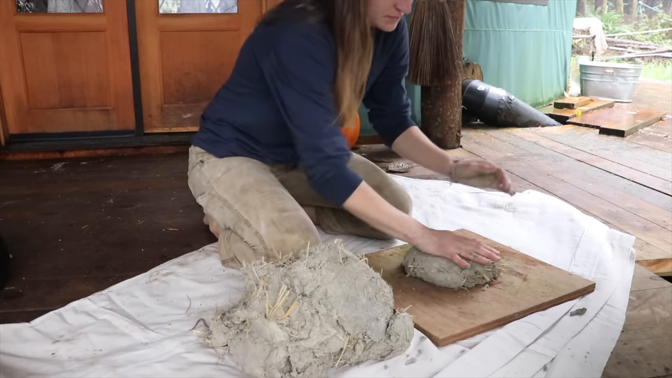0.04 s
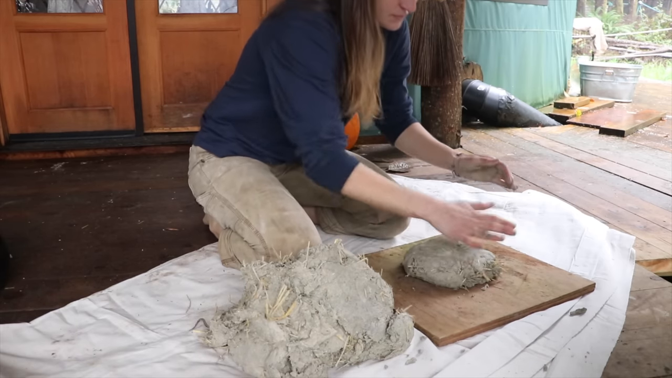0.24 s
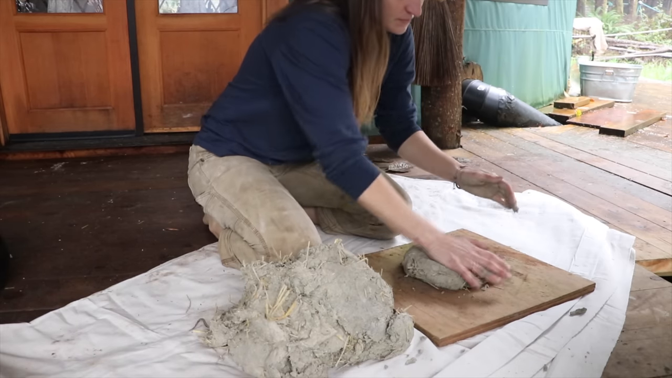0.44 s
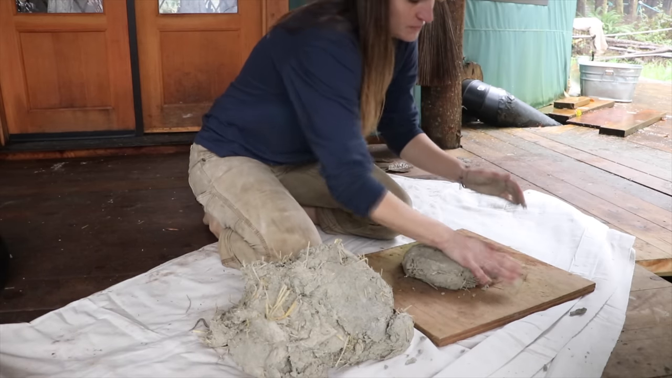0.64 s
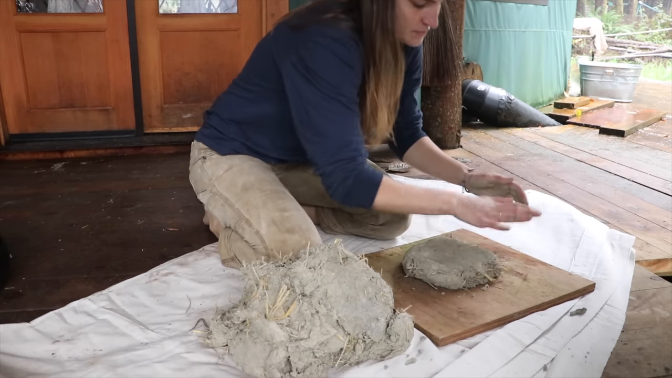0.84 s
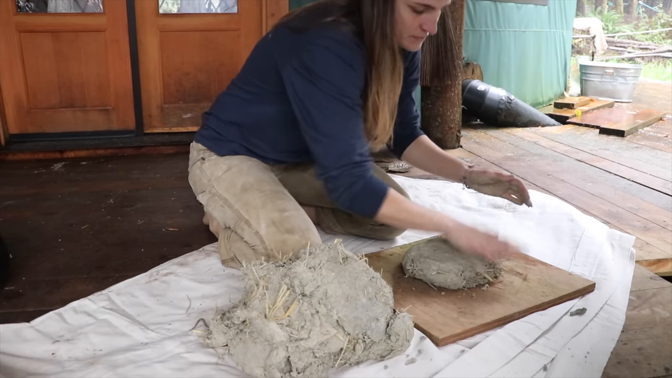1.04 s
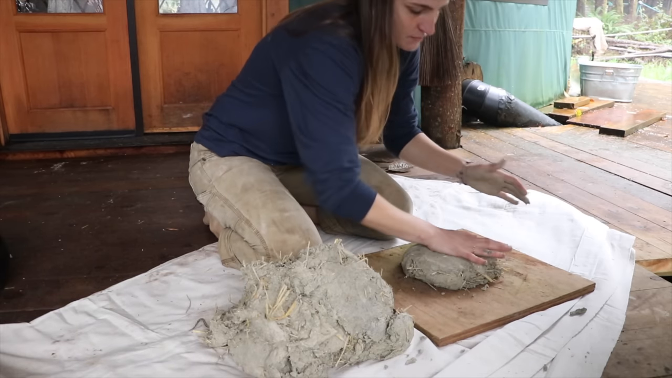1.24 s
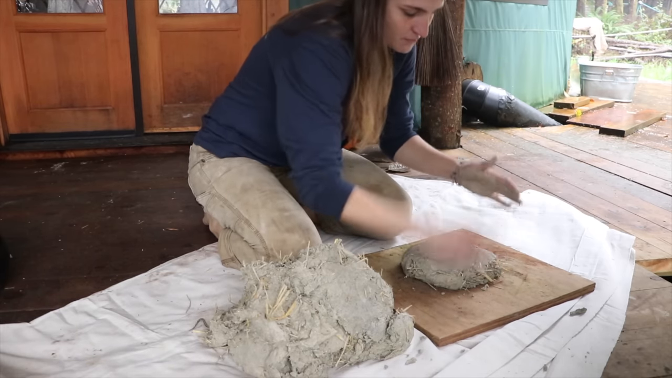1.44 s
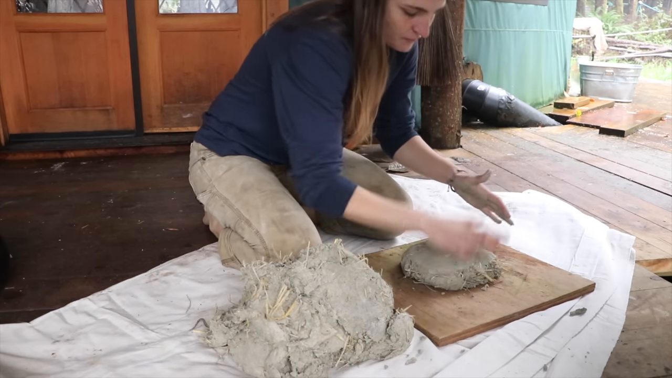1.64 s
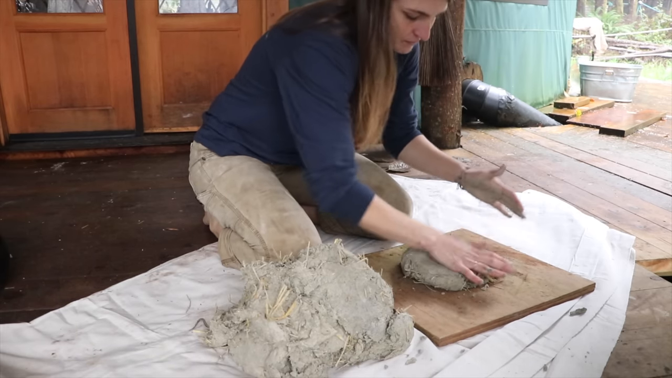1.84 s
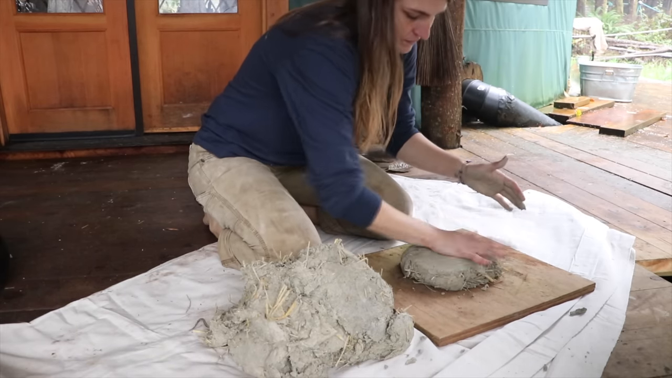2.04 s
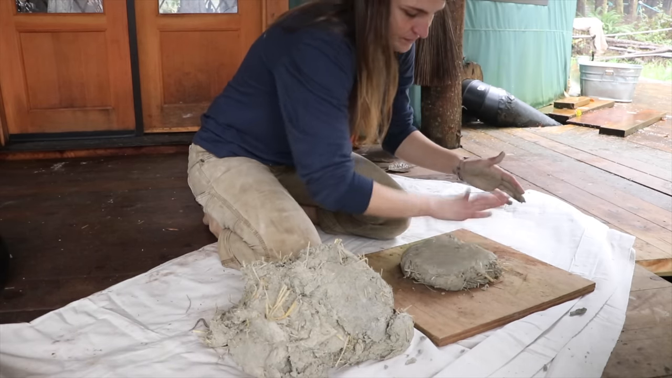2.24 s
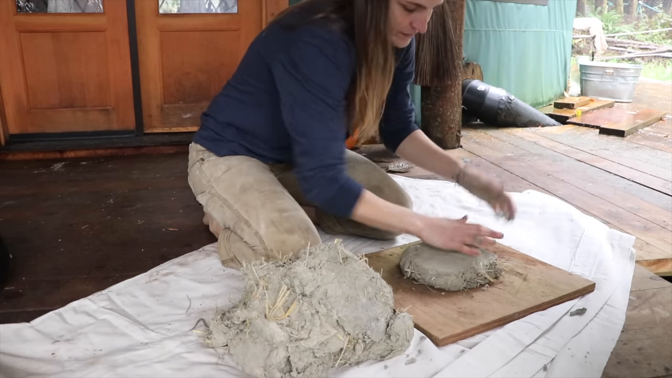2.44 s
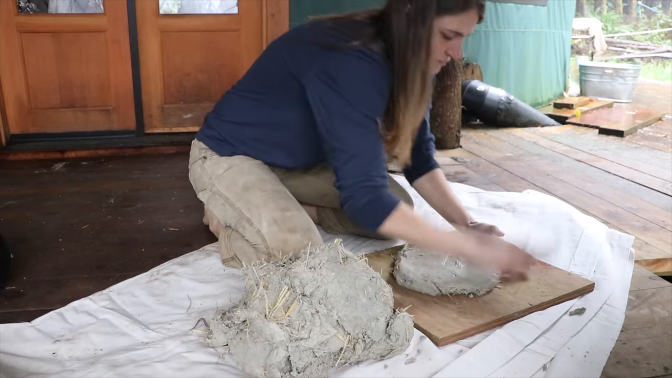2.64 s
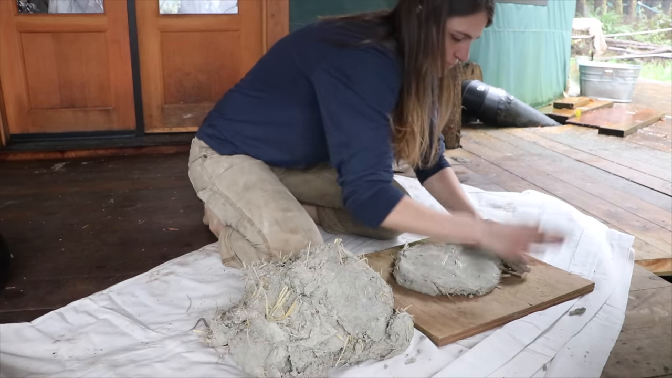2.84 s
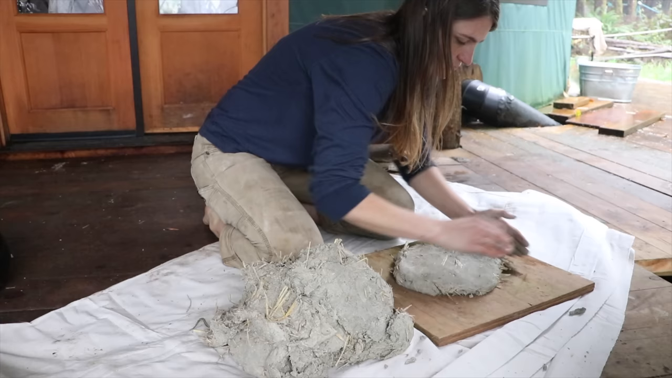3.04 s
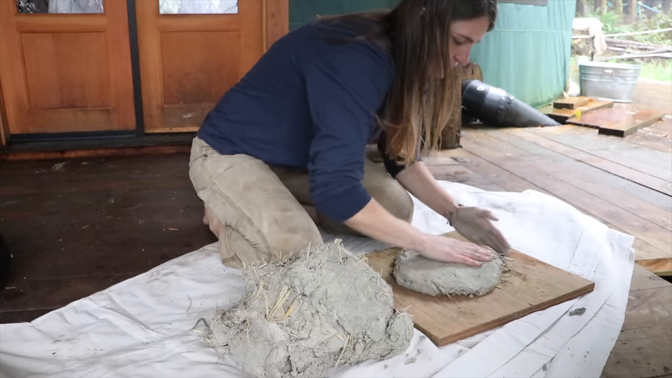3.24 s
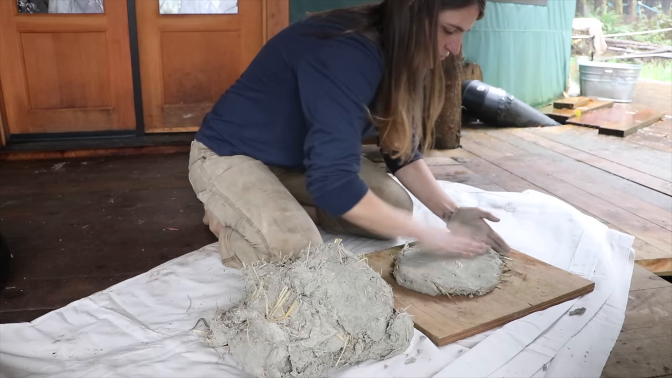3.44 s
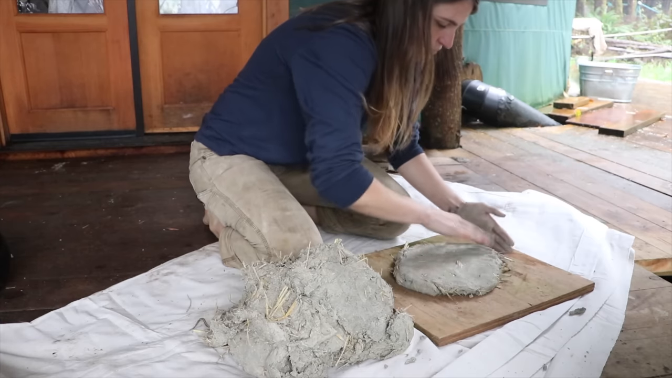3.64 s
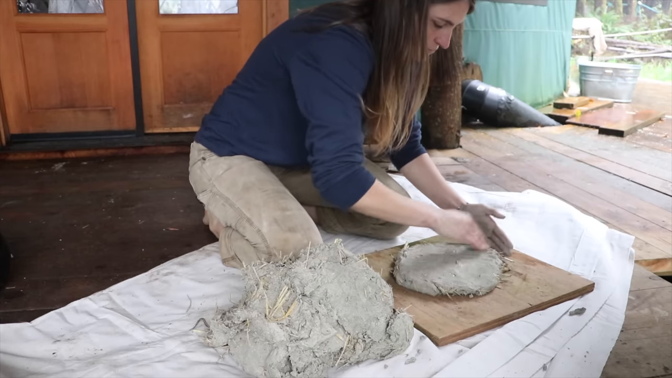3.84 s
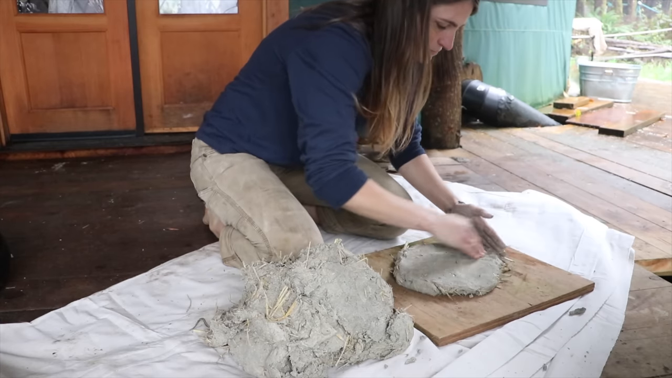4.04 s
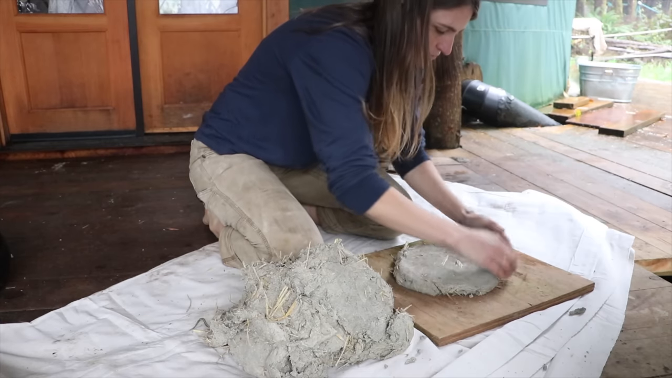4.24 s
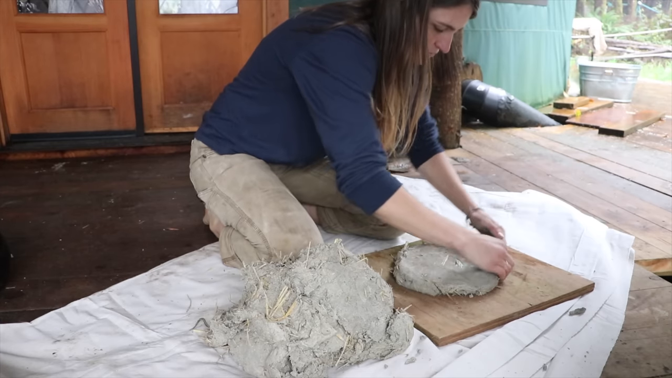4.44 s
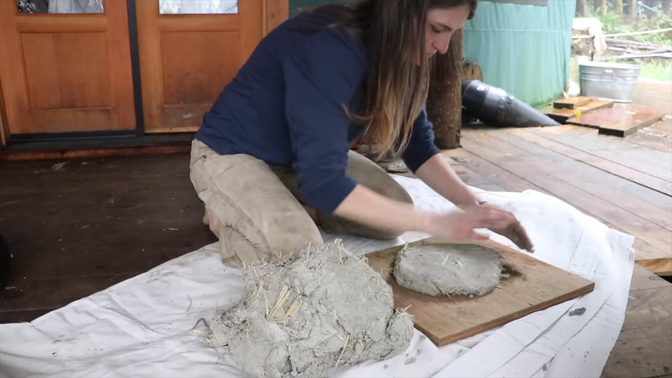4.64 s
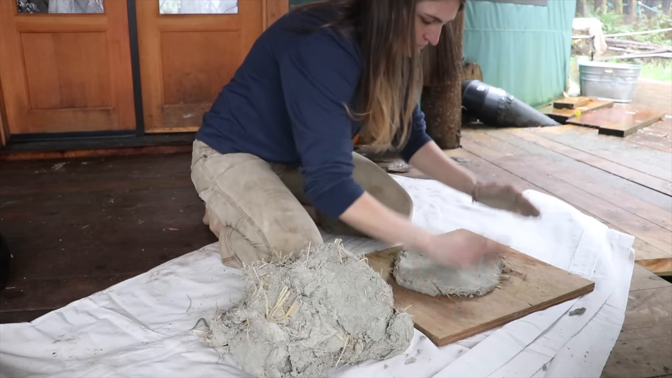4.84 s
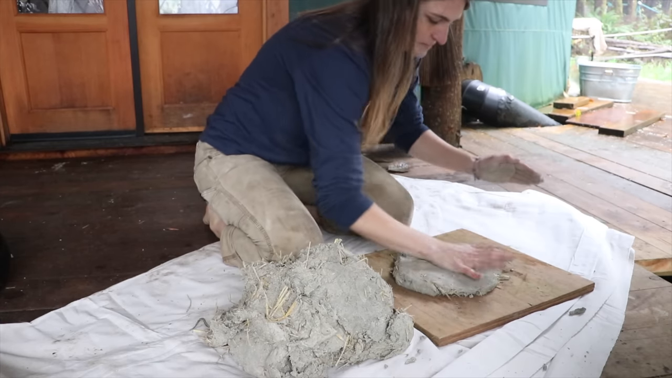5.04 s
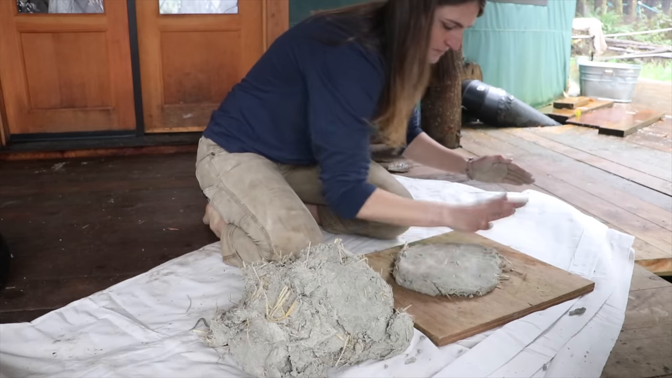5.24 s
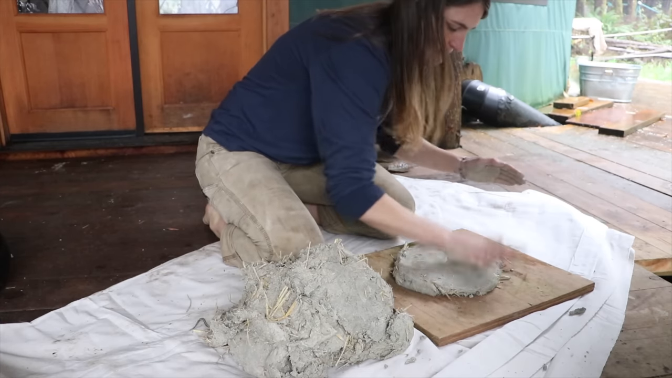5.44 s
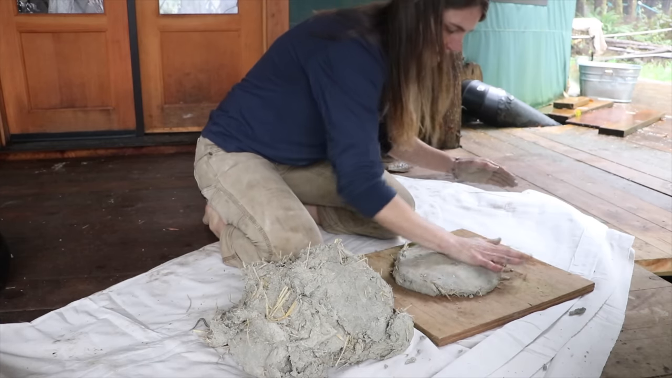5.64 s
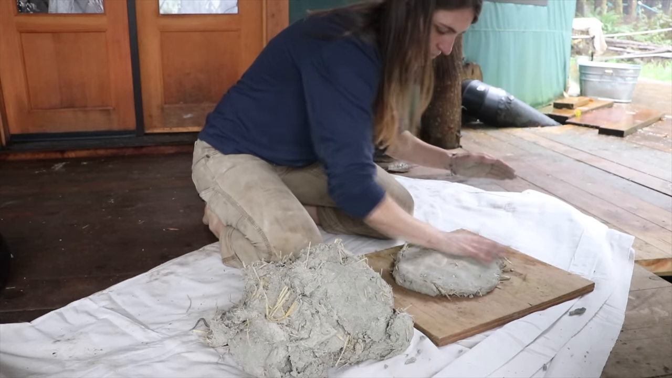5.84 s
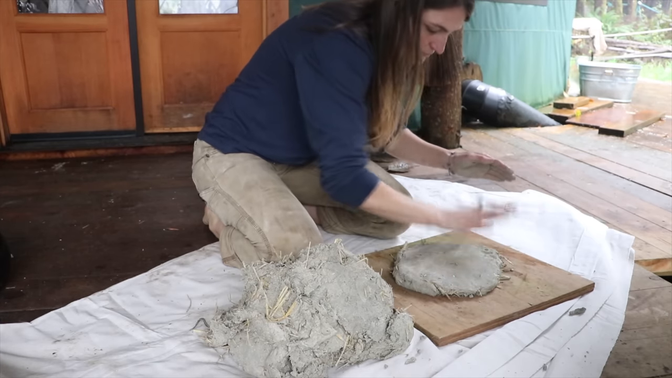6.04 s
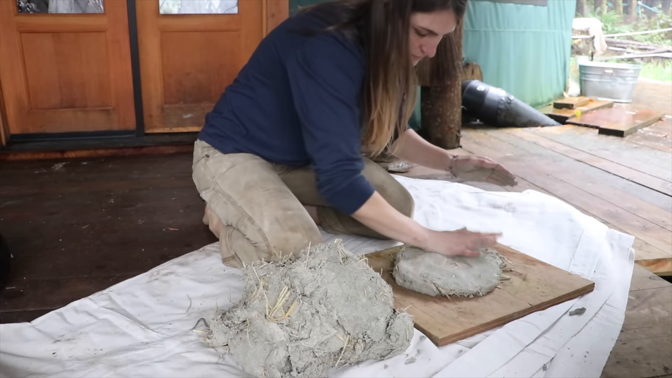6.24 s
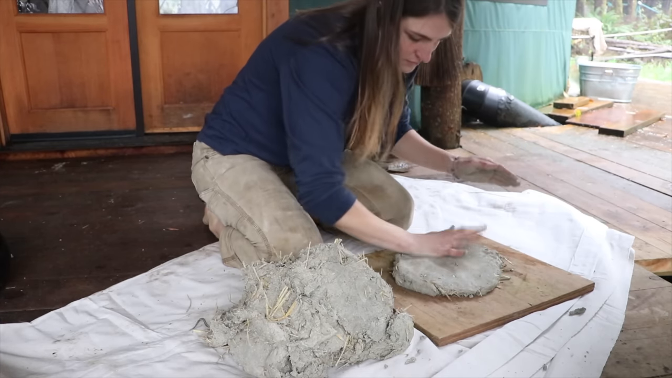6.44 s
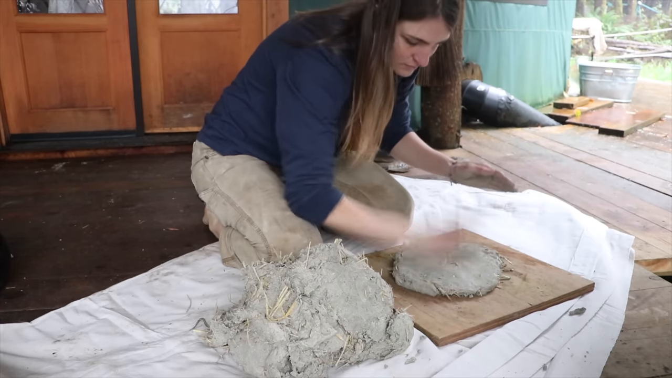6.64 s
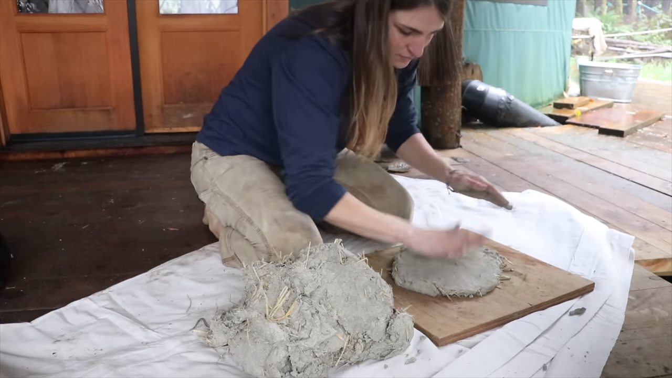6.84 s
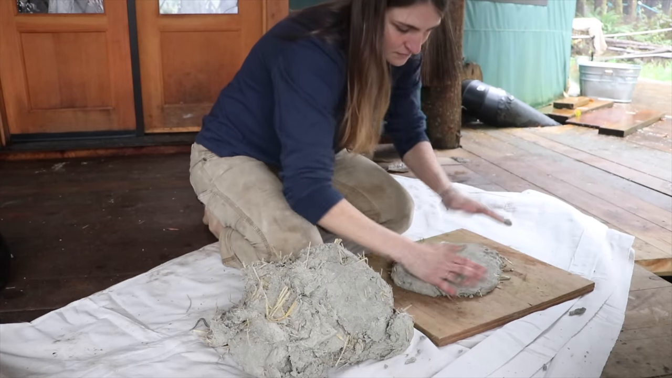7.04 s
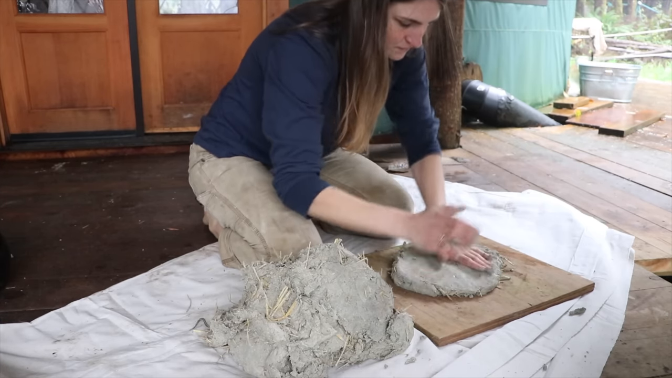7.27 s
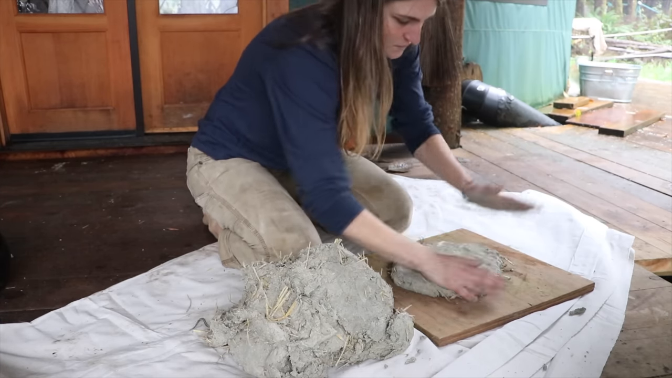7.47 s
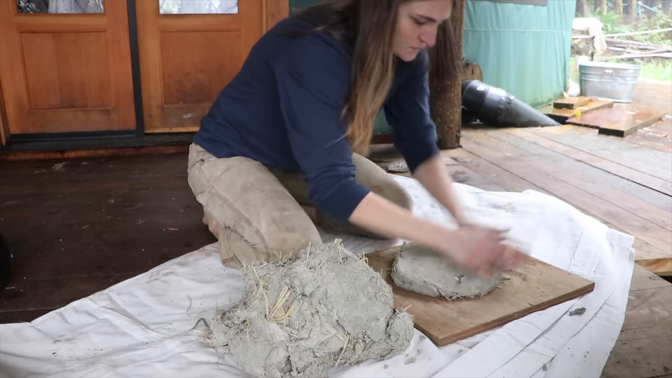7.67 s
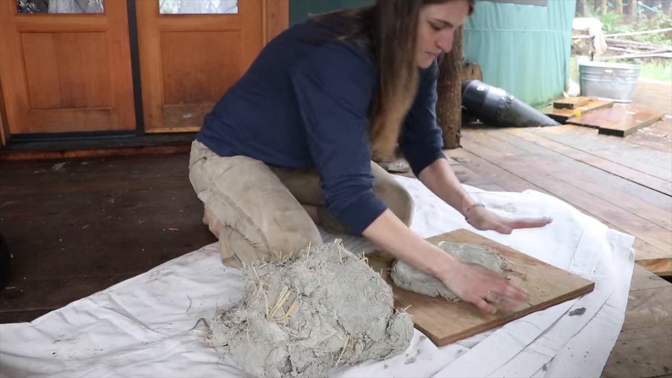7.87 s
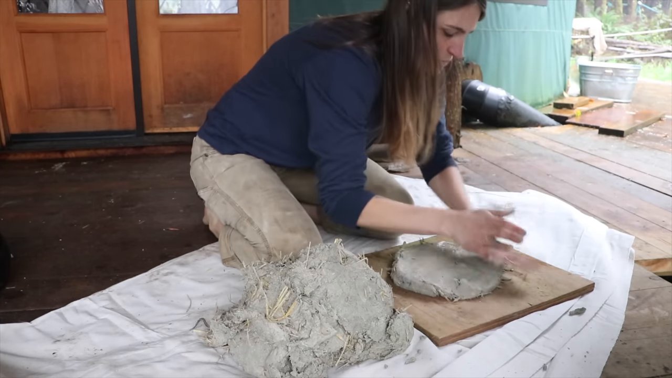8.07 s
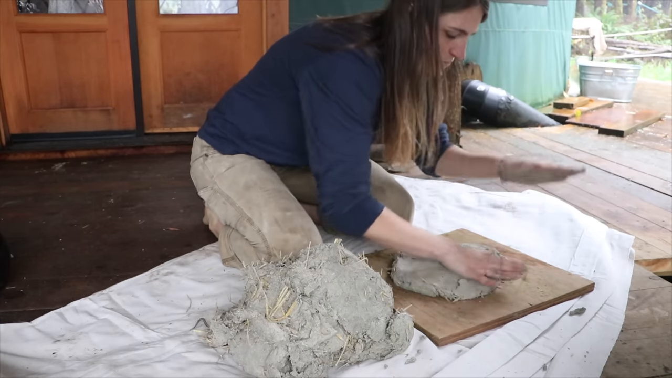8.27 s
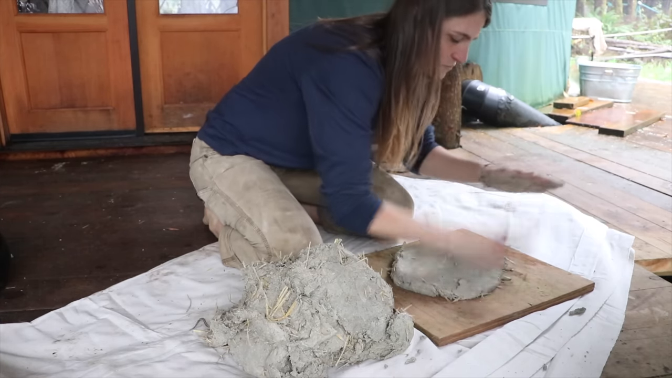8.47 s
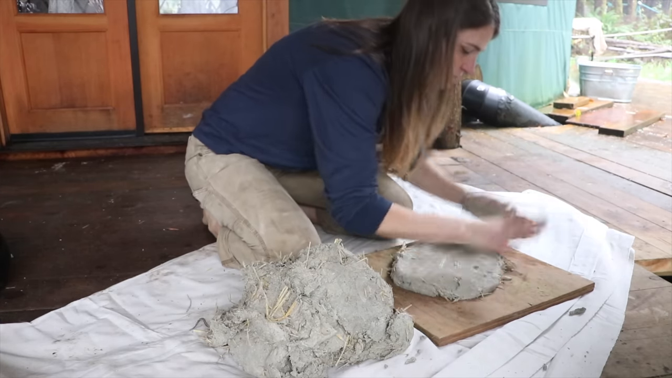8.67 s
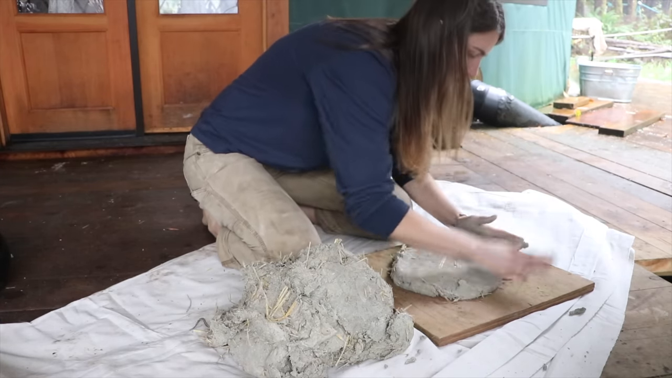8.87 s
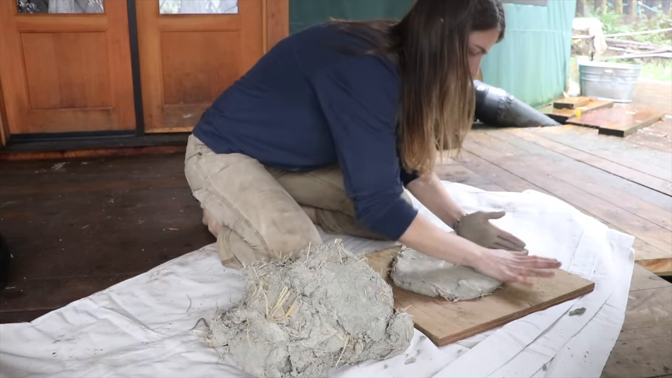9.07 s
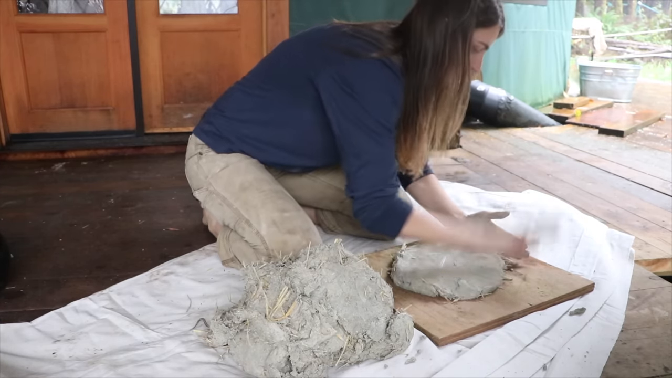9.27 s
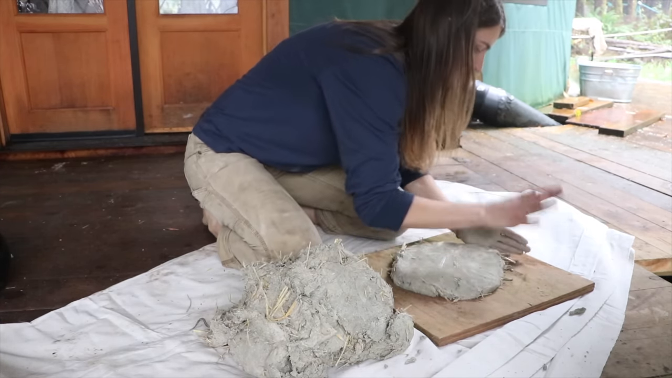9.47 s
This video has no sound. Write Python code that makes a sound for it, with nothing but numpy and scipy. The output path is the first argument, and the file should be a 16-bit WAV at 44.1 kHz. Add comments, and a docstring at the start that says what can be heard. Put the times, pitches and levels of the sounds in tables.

```python
"""Wet slaps, a few a second, over light rain: bare hands pat a cake of clay and straw flat on a board
lying on a wooden porch. Each slap is the crack of a bursting water film, a pop of air under the palm
and a thump into the deck, echoed by roof and wall. A sleeve swishes ahead of it, and the skin peels off
after it with a fine crackle. In between, the palms rub the clay smooth, the roof drips, and once a faint
high ring comes and goes. The hardest blows overload the microphone."""
import sys
import numpy as np
from scipy import signal
from scipy.fft import rfft, irfft, next_fast_len
from scipy.io import wavfile

SR = 44100
rng = np.random.default_rng(int(sys.argv[2]) if len(sys.argv) > 2 else 0)


def file_out(sig):
    """Save sig as 16-bit WAV at sys.argv[1]."""
    # one column per channel
    cols = np.atleast_2d(sig).T
    # limit, then scale
    lim = np.clip(cols, -1, 1)
    pcm = np.round(lim * 32767).astype(np.int16)
    wavfile.write(sys.argv[1], SR, pcm)


N = 419391
TIME = np.arange(N) / SR
SLAP_TIME = TIME[:int(.4 * SR)]

# Echo of the porch roof and house wall. Each row: octave centre in Hz, relative spectral level in dB,
# seconds to fall 60 dB.
PORCH_ECHO = [(216, -0.5, 0.21), (480, -0.5, 0.2), (880, -0.5, 0.19), (1670, -1.5, 0.2), (3890, -0.5, 0.2),
              (6500, -1, 0.18), (14000, -18, 0.42)]
# Colour of the rain on roof and yard. Each row: frequency in Hz, relative spectral level in dB.
RAIN_SPECTRUM = [(30, -6), (50, -14), (100, -0.5), (300, 3), (650, 0), (1700, 0.5), (2600, -6.5),
                 (3400, -0.5), (4050, 0.5), (4800, -14), (8000, -17.5), (10500, -30.5), (16000, -27.5)]
# Tones of the faint high ring. Each row: pitch in Hz, level in dB.
RING_TONES = [(3620, -58), (4317, -56), (5809, -52), (8306, -62)]
# Near drops from the roof. Each row: time in seconds, relative level in dB, pitch in Hz.
ROOF_DRIPS = [(1.669, -28.5, 3940), (3.848, -31, 4030), (4.138, -33, 3920), (4.26, -33, 3800),
              (6.013, -29.5, 3950)]
# Smoothing strokes of the palm. Each row: midpoint in seconds, level in dB, length in seconds,
# centre frequency in Hz.
PALM_STROKES = [(2.93, -36, .043, 890), (3.343, -43, .037, 1800), (3.644, -40.5, .062, 1250),
                (4.28, -42, .1, 1700), (4.548, -42, .028, 1200), (4.65, -36.5, .027, 816),
                (6.783, -39, .035, 1800), (7.031, -36.5, .052, 400), (7.137, -40, .03, 2800)]
# Modes of the board on the deck planks. Each row: pitch in Hz, relative gain in dB, seconds to fall 60 dB.
DECK_MODES = [(32.7, 18, 0.89), (58.6, 11.5, 0.44), (88.6, 10, 0.29), (113, -2, .28), (144.2, -10, 0.3),
              (172.5, -9.5, 0.28), (225, -7, .15), (280.7, -4, .18), (411, -11.5, 0.36), (548, -7, 0.19),
              (740, -6, 0.18)]
# The jolt comes back from the ends of the planks. Each row: delay in seconds, gain in dB.
PLANK_RETURNS = [(.039, -22.5), (.087, -24.5)]
# Hand on clay; levels are relative. Each row: time in seconds, weight of the blow in dB, palm pop in dB,
# pop pitch in Hz, skin smack in dB, water squirt in dB, stay in seconds until the hand comes free.
HAND_SLAPS = [(0.0182, -25.0, -29.5, 1000.0, -21.5, -31.0, 0.18),
              (0.324, -20.5, -30.0, 490.0, -23.0, -26.5, 0.2),
              (0.649, -23.5, -29.0, 400.0, -25.5, -23.0, 0.14),
              (0.9261, -10.0, -15.5, 790.0, -13.5, -13.5, 0.13),
              (1.1919, -9.5, -10.5, 394.0, -10.5, -16.5, 0.155),
              (1.489, -14.0, -25.5, 630.0, -15.0, -18.0, 0.13),
              (1.7707, -8.0, -13.0, 510.0, -7.0, -12.0, 0.125),
              (2.0503, -9.0, -7.5, 500.0, -9.5, -8.5, 0.13),
              (2.3164, -11.0, -11.5, 546.0, -15.0, -18.0, 0.1),
              (2.6947, -9.0, -28.0, 407.0, -22.5, -15.5, 0.095),
              (3.198, -33.5, -44.0, 600.0, -48.5, -42.0, 0.185),
              (3.477, -34.0, -44.0, 600.0, -43.5, -39.5, 0.175),
              (3.724, -26.0, -46.5, 500.0, -47.0, -51.0, 0.15),
              (3.981, -32.5, -59.0, 500.0, -51.5, -53.0, 0.13),
              (4.7221, -12.0, -30.5, 450.0, -27.0, -29.0, 0.12),
              (5.0369, -4.5, -24.0, 400.0, -16.5, -15.0, 0.12),
              (5.331, -6.0, -30.0, 480.0, -21.5, -26.0, 0.125),
              (5.5967, -7.0, -20.5, 1030.0, -17.0, -19.5, 0.155),
              (5.8673, -12.0, -23.0, 795.0, -20.0, -19.0, 0.155),
              (6.159, -8.0, -12.0, 535.0, -17.5, -14.5, 0.13),
              (6.433, -21.5, -36.0, 920.0, -35.5, -32.5, 0.11),
              (6.6902, -12.5, -26.5, 400.0, -21.5, -19.0, 0.145),
              (6.958, -13.0, -11.5, 430.0, -17.5, -14.5, 0.115),
              (7.1847, -8.5, -6.5, 640.0, -14.0, -17.0, 0.19),
              (7.483, -7.0, -12.0, 390.0, -8.5, -11.5, 0.155),
              (7.7224, -10.0, -17.5, 730.0, -12.5, -10.5, 0.08),
              (7.8276, -6.5, -9.0, 760.0, -13.5, -10.0, 0.125),
              (7.9691, -7.0, -14.5, 1060.0, -19.0, -19.0, 0.13),
              (8.2452, -9.0, -19.0, 810.0, -15.0, -11.5, 0.085),
              (8.5307, -7.5, -5.0, 720.0, -16.0, -14.0, 0.1),
              (8.7982, -6.5, -11.5, 960.0, -14.0, -20.0, 0.12),
              (9.059, -4.0, -24.0, 1190.0, -19.5, -17.0, 0.085),
              (9.325, -6.0, -25.5, 520.0, -17.0, -10.0, 0.145)]

ECHO_FILTERS = [signal.butter(2, [hz / np.sqrt(2), min(hz * np.sqrt(2), .47 * SR)], "band",
                              fs=SR, output="sos") for hz, *_ in PORCH_ECHO]


def from_db(db):
    """Decibels to amplitude."""
    return 10 ** (np.asarray(db) / 20)


def rms_one(x):
    """Scale a texture to rms 1."""
    return x / np.sqrt(np.mean(x ** 2) + 1e-20)


def unit_blow(x):
    """Scale a transient to the energy of 10 ms at rms 1."""
    return x * np.sqrt(SR / 100 / (np.sum(x ** 2) + 1e-20))


def add(track, s, sound):
    """Mix a sound into the track at s seconds."""
    start = max(round(s * SR), 0)
    track[start:start + len(sound)] += sound[:max(N - start, 0)]


def band(x, low_hz, high_hz):
    """Gentle band-pass."""
    sos = signal.butter(2, [low_hz, min(high_hz, .47 * SR)], "band", fs=SR, output="sos")
    return signal.sosfilt(sos, x + 1e-18)


def resonate(x, hz, width_hz):
    """One resonance, gain 1 at its peak."""
    r = np.exp(-np.pi * width_hz / SR)
    feedback = [1, -2 * r * np.cos(2 * np.pi * hz / SR), r * r]
    return signal.lfilter(np.array([1, 0, -1]) * (1 - r * r) / 2, feedback, x + 1e-18)


def grains(size, per_s, spread_db=2):
    """Random clicks of uneven size and sign."""
    clicks = (rng.random(size) < per_s / SR) * rng.standard_normal(size)
    return clicks * from_db(spread_db * np.clip(rng.standard_normal(size), -2, 2))


def swell(s, length_s):
    """A smooth rise and fall around s seconds."""
    return np.exp(-2 * np.minimum(((TIME - s) / length_s) ** 2, 20))


def porch(x, gap_s=.0036, build_s=.0025, gain_db=-30):
    """Dense echoes off roof and wall die octave by octave, in a fresh pattern for every sound."""
    age = np.maximum(SLAP_TIME[:SR // 4] - gap_s, 0)
    white = rng.standard_normal((2, len(age)))   # neighbouring octaves get unrelated noise
    echoes = sum(signal.sosfilt(ECHO_FILTERS[k], white[k % 2]) * from_db(db - 60 * age / t60)
                 for k, (_, db, t60) in enumerate(PORCH_ECHO))
    echoes *= 1 - np.exp(-age / build_s)
    return from_db(gain_db) * signal.fftconvolve(x, echoes)[:len(x)]


def rain(wash_db=-43, patter_db=-50.5):
    """The rain bed: a far wash with single drops in it, and a nearer ringing patter."""
    fall = rms_one(rng.standard_normal(N)) + .45 * rms_one(grains(N, per_s=1400))
    hz, db = np.transpose(RAIN_SPECTRUM)
    size = next_fast_len(N)
    colour = from_db(np.interp(np.log(np.fft.rfftfreq(size, 1 / SR) + 1), np.log(hz), db))
    wash = irfft(rfft(fall, size) * colour, size)[:N]
    patter = band(resonate(grains(N, per_s=260), hz=3880, width_hz=520), 3080, 4100)
    return from_db(wash_db) * rms_one(wash) + from_db(patter_db) * rms_one(patter / 2 + porch(patter))


def faint_ring(at_s=4.88, length_s=.22, width_hz=25):
    """A few thin, wavering tones come and go together."""
    hiss = rng.standard_normal(N)
    tones = sum(from_db(db) * rms_one(resonate(resonate(hiss, hz, width_hz), hz, width_hz))
                for hz, db in RING_TONES)
    return swell(at_s, length_s) * tones


def drips(rise_s=.001694, splash_db=-8.5, trim_db=-3.5):
    """Each drop from the roof gives a small splash and a short high plink."""
    out, t = np.zeros(N), SLAP_TIME[:SR // 20]
    for s, db, hz in ROOF_DRIPS:
        burst = t * np.exp(-t / rise_s) * rng.standard_normal(len(t))
        plink = unit_blow(band(resonate(burst, hz, width_hz=420), 3100, 4050))
        splash = from_db(splash_db) * unit_blow(band(burst, 600, 4800))
        add(out, s - rise_s, from_db(db + trim_db) * (plink + splash))
    return out


def sleeve(full_swing_db=-47, lead_s=.06):
    """Cloth swishes as the arm comes down, louder for a heavier swing."""
    swings = sum(from_db(full_swing_db + .4 * weight) * swell(s - lead_s, length_s=.07)
                 for s, weight, *_ in HAND_SLAPS)
    cloth = band(resonate(rng.standard_normal(N), hz=1400, width_hz=1800), 230, 4700)
    return swings * rms_one(cloth)


def sticky_snaps(size, clump_s=.007, clump_db=3.0):
    """Threads of wet clay snap in uneven clumps: a bright crackle at rms 1."""
    position = np.arange(size) / (clump_s * SR)
    count = int(position[-1]) + 2
    clumps = np.interp(position, np.arange(count), rng.standard_normal(count))
    snaps = grains(size, per_s=2500) * from_db(clump_db * clumps)
    return rms_one(band(snaps, 6000, 16600))


def rubs(q=.88, tack_db=-17):
    """Skin drags over grit and straw, catching and slipping; the wet surface crackles under it."""
    grit = band(grains(N, per_s=2500, spread_db=3.0), 230, 4700)
    tack = from_db(tack_db) * sticky_snaps(N)
    return sum(from_db(db) * swell(s, length) * (rms_one(resonate(grit, hz, hz / q)) + tack)
               for s, db, length, hz in PALM_STROKES)


def peels(full_blow_db=-42, share_of_stay=.76, release_s=.003, last_snap=.6):
    """Skin tears off the clay, building until the hand comes free; a heavier blow sticks harder."""
    out = np.zeros(N)
    for s, weight, *_, stay in HAND_SLAPS:
        length = share_of_stay * stay
        t = np.arange(-length, 5 * release_s, 1 / SR)
        pull = (t < 0) * (1 + t / length) ** 2 + last_snap * np.exp(-np.abs(t) / release_s)
        add(out, s + stay - length, from_db(full_blow_db + .22 * weight) * pull * sticky_snaps(len(t)))
    return out


def thump(hz, swell_s=.0068, dip_s=.01006, lag_s=.0021, overtone_ratio=1.866, overtone_db=-13.0):
    """The low end: soft clay passes the blow on slowly; the board dips, springs back and is damped."""
    age = np.maximum(SLAP_TIME - lag_s, 0) / swell_s
    envelope = (age * np.exp(1 - age)) ** 2.62
    phase = 2 * np.pi * hz * (SLAP_TIME - dip_s)
    swing = from_db(overtone_db) * np.sin(overtone_ratio * phase) - np.cos(phase)
    return unit_blow(band(envelope * swing, 68, 1700))   # a small board radiates little deep bass


def palm_pop(hz, q=2.3, close_s=.0001, lag_s=.00293, turbulence=.17, leak_s=.0025, knock_db=-6.0):
    """The body: one pulse squeezes the air trapped under the palm and knocks on the board."""
    t = np.maximum(SLAP_TIME - lag_s, 0)
    leak = turbulence * np.exp(-t / leak_s) * rng.standard_normal(len(t))
    push = (t > 0) * (np.exp(-t / close_s) + leak)
    pocket = unit_blow(resonate(push, hz, hz / q))
    knock = unit_blow(resonate(push, hz=330, width_hz=230))
    return unit_blow(band(pocket + from_db(knock_db) * knock, 171, 1070))


def wet_contact(sink, land_s=.00345, rise_s=.0005, fall_s=.0018, ooze_s=.0057):
    """Fingers touch first, the palm lands and the water film bursts; sink stretches the decay."""
    t = SLAP_TIME[:SR // 10] - land_s
    fingers = from_db(-13) * (1 + t / land_s)
    landing = np.exp(np.minimum(t, 0) / rise_s)
    burst = np.exp(-np.abs(t) / (fall_s * sink))
    ooze = from_db(-25) * np.exp(-np.abs(t) / ooze_s)
    return np.where(t < 0, fingers + landing, burst + ooze) * rng.standard_normal(len(t))


def crack(smack_db, squirt_db, pop_db, weight_db, smack_q=1.17, squirt_hz=3550, squirt_q=5.0):
    """The attack: gaps between skin and clay colour the burst; the finest droplets sizzle on top."""
    sink = 1 + .031 * max(smack_db + 19, 0)   # a hard blow sinks in for longer
    smack_hz = 1850 * 2 ** (-.035 * (pop_db - smack_db))   # a cupped palm dulls the smack
    spray_db = -9.8 + .74 * (smack_db + squirt_db) / 2 + .21 * weight_db
    smack = band(resonate(wet_contact(sink), smack_hz, smack_hz / smack_q), 810, 2990)
    squirt = band(resonate(wet_contact(sink), squirt_hz, squirt_hz / squirt_q), 2440, 4500)
    spray = resonate(wet_contact(sink=.94), hz=7500, width_hz=9000)
    out = from_db(smack_db) * unit_blow(smack)
    out += from_db(squirt_db) * unit_blow(squirt)
    out += from_db(spray_db) * unit_blow(spray)
    return np.pad(out, (0, len(SLAP_TIME) - len(out)))


def deck(x):
    """Board and planks ring in their modes, which alternate in polarity."""
    return sum((-1) ** k * from_db(db) * resonate(x, hz, np.log(1000) / (np.pi * t60))
               for k, (hz, db, t60) in enumerate(DECK_MODES))


def slaps(lead_s=.003, pop_trim_db=3.0, near_pop_db=2.5, near_crack_db=1.0, deck_db=-5.5, echo_db=-3.5):
    """Thump, pop and crack stack into one hit that shakes the deck and echoes under the roof."""
    out = np.zeros(N)
    for s, weight, pop, pop_hz, smack, squirt, _ in HAND_SLAPS:
        thump_hz = 138 * 2 ** (.009 * (pop - weight))   # a cupped palm traps more air: a higher thump
        jolt = from_db(weight) * thump(thump_hz)
        pop_gain = from_db(pop + pop_trim_db)
        air = pop_gain * palm_pop(pop_hz)
        water = crack(smack, squirt, pop, weight)
        direct = jolt + from_db(near_pop_db) * air + from_db(near_crack_db) * water
        # air and spray burst differently on each side of the hand, so each surface returns its own slap
        echo = sum(porch(jolt + pop_gain * palm_pop(pop_hz) + crack(smack, squirt, pop, weight))
                   for surface in ("roof", "wall"))
        add(out, s - lead_s, direct + from_db(deck_db) * deck(jolt + air) + from_db(echo_db) * echo)
        for delay_s, db in PLANK_RETURNS:
            add(out, s - lead_s + delay_s, from_db(db) * jolt)
    return out


def gain_control(x, threshold_db=-9.5, share=.19, attack_s=.013, release_db_per_s=13.0):
    """Light compression: loud blows duck the gain a little, and it creeps back."""
    cut_db = share * np.clip(20 * np.log10(np.abs(x) + 1e-9) - threshold_db, 0, 12)
    recovery_db = release_db_per_s * TIME
    held_db = np.maximum.accumulate(cut_db + recovery_db, axis=-1) - recovery_db
    r = np.exp(-1 / (attack_s * SR))
    return x * from_db(-signal.lfilter([1 - r], [1, -r], held_db))


def scene():
    """Mono mix: slaps up front, small sounds and their echo behind, ring and rain at the back."""
    small = peels() + rubs() + sleeve() + drips()
    return (slaps() + small + porch(small) + faint_ring() + rain())[None, :]


def record(dry, cutoff_hz=16000):
    """The gain reacts too late, so the hardest hits clip at full scale; the top end is cut."""
    clipped = np.clip(gain_control(dry), -1, 1)
    return signal.sosfilt(signal.cheby1(10, .2, cutoff_hz, fs=SR, output="sos"), clipped)


dry = scene()
out = record(dry)
file_out(out)
```